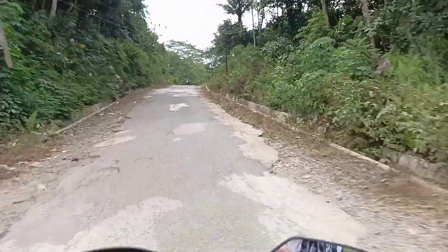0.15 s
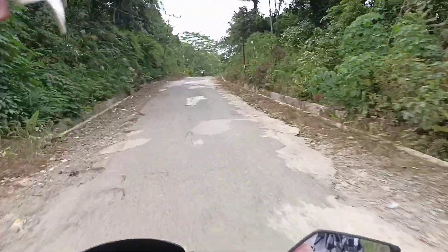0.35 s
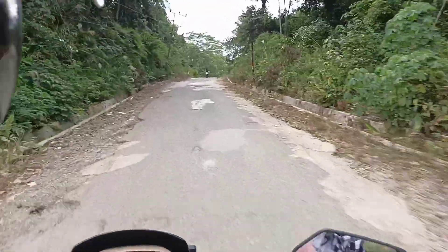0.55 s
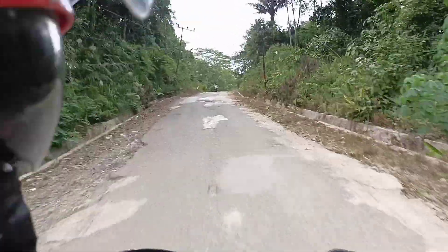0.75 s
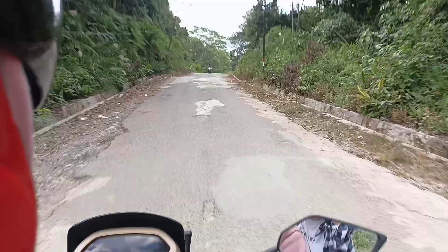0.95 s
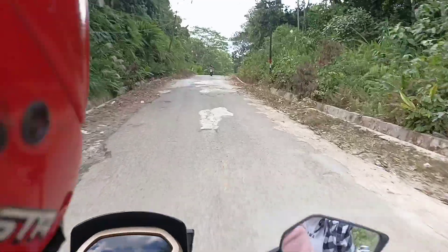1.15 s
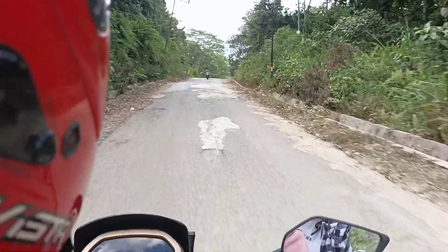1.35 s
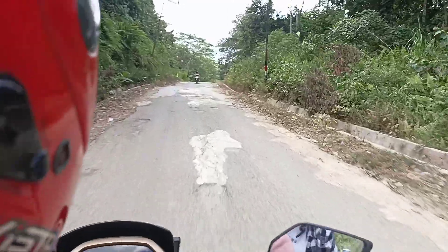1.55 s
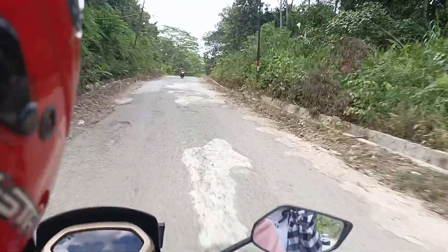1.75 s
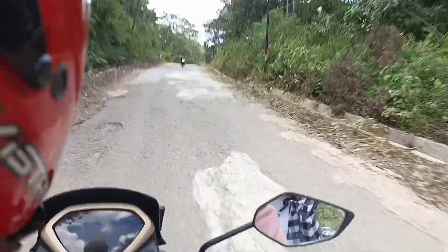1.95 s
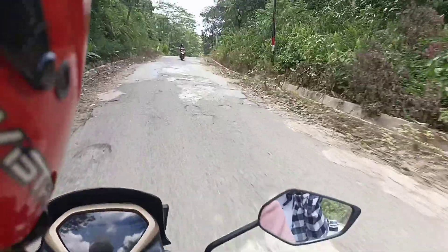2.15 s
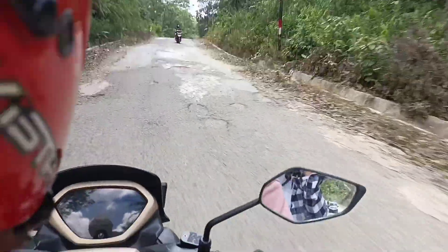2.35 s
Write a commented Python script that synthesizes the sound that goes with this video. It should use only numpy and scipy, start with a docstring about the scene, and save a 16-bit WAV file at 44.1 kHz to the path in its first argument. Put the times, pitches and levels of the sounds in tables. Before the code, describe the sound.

Heavy wind rumble and tearing gusts on a motorbike ride, with tyre hiss and faint metallic chirping

```python
"""Motorbike on a rough country road

Heard from behind the rider, with the slipstream buffeting two microphone ports separately.
Shaped noise makes the wind: lumpy pressure on both ports, rasping gusts and thumps on the left,
short slaps on the right. Underneath lie tyre and air hiss from steadier noise, thin flickering top treble
on the left, an engine hum of wavering harmonics with ringing clatter, and a thin metallic chirp
of narrow-band noise once per engine cycle.
"""
import sys
import numpy as np
from scipy import signal
from scipy.fft import rfft, irfft
from scipy.io import wavfile
from scipy.ndimage import uniform_filter1d

SR = 44100
rng = np.random.default_rng(int(sys.argv[2]) if len(sys.argv) > 2 else 0)


def output_pcm(signal):
    """Save a mono or channel-first signal as 16-bit PCM at the path in sys.argv[1].

    Samples are clipped to [-1, 1] before scaling.
    """
    pcm = np.clip(np.atleast_2d(signal).T, -1, 1) * 32767
    wavfile.write(sys.argv[1], SR, np.round(pcm).astype(np.int16))


N = 110250
TIME = np.arange(N) / SR
FREQS = np.fft.rfftfreq(N, 1 / SR)

# Spectra give relative level per Hz; event lengths are the standard deviation of a bell shape.

# tyre and air hiss, before the trim HISS_DB: start_s, left_db, right_db
HISS_LEVEL = [(0, -48.5, -44.5), (.2, -41.5, -37.5), (.42, -38.5, -35), (.51, -34.5, -31),
              (.61, -37, -37.5), (.69, -36.5, -35), (.8, -38.5, -37), (1.0, -37.5, -37),
              (1.19, -33.5, -34.5), (1.35, -37.5, -36.5), (1.68, -37.5, -38), (1.97, -36.5, -36.5),
              (2.09, -41.5, -41.5), (2.33, -38, -39.5), (2.41, -43, -44), (2.5, -39, -44)]
# hiss spectrum at each port: freq_hz, left_db, right_db
HISS_COLOUR = [(150, -8, -8), (500, 3, 4), (1300, 2, 1), (1750, -3, -4), (2300, -2, -1), (2850, -2, -2.5),
               (3300, -3, -8), (3800, -2, -7), (4350, -6, -11), (4750, -6, -23), (5500, -9, -17),
               (6400, -13, -15), (7400, -12, -11), (8000, -19, -19), (8600, -27, -29), (10000, -38, -50)]
# top treble at the left port: start_s, level_db
TOP_TREBLE_LEVEL = [(0, -55.5), (.48, -57.5), (.53, -48.5), (.59, -55), (.64, -52), (.8, -63), (.93, -57),
                    (.98, -49.5), (1.17, -53.5), (1.22, -51), (2.0, -49.5), (2.33, -54.5), (2.5, -59)]
# top treble spectrum: freq_hz, level_db
TOP_TREBLE_COLOUR = [(4000, -24), (8500, -12), (10000, 2), (12500, -2), (15000, 2)]
HISS_DB, HISS_FLUTTER_DB = 0.5, 2.05  # level trim; rms depth of the flutter

# engine speed: start_s, cycles_per_s
ENGINE_RATE = [(0, 40.1), (.35, 40.4), (1.07, 41.5), (1.35, 42.3), (1.75, 42.5), (2.05, 41.6), (2.5, 40.6)]
# hum harmonics, before their wavering: multiple_of_cycle_rate, left_db, right_db
ENGINE_ORDERS = [(2, -32, -37), (3, -43, -37), (9, -38, -37.5), (10, -43, -37.5)]
# ringing clatter in every cycle, before its swells: freq_hz, width_hz, cycles_after_chirp, left_db, right_db
CLATTER = [(944, 41, -0.65, -46, -45.5), (1476, 140, -0.064, -49, -42.5), (2864, 170, -0.14, -45, -43),
           (5650, 880, 0.011, -53.5, -56)]
CLATTER_S = 0.0026

# base strength of the regular chirps: start_s, level_db
CHIRP_LEVEL = [(0, -53), (.25, -42), (.5, -37.5), (.62, -41), (.9, -38), (1.1, -39.5), (1.6, -38.5),
               (1.8, -36.5), (2.0, -36.5), (2.12, -42), (2.33, -40.5), (2.5, -45)]
# chirps that stand out: start_s (their peak), level_db, pitch_hz, width_hz
LOUD_CHIRPS = [(.686, -29, 4100, 260), (0.711, -30.5, 4170, 150), (.856, -33, 3900, 220),
               (1.195, -31.5, 3830, 240), (1.274, -33.5, 3880, 180)]
# the chirps swell and fade every few cycles: start_s, cycles_per_swell
ACCENT_PERIOD = [(0, 3), (.7, 3), (.85, 2.4), (1.0, 3.39), (1.45, 3.39), (1.6, 3.15), (2.0, 3.3),
                 (2.1, 3.75)]
CHIRP_HZ, CHIRP_WIDTH_HZ, CHIRP_S, CHIRP_SPREAD_DB = 4175, 87, 0.0034, 2.24  # spread: chance per cycle
RING_SHARED, CHIRP_RIGHT_DB = .75, -4  # likeness of ringing at the ports; right port relative to left
FIRST_CHIRP_TURN, FIRST_ACCENT_TURN = .76, .25  # turns until the first chirp, until the first swell peak
ACCENT_DB, ACCENT_TOP = 5.5, .5  # depth; height where the swell flattens, so strong chirps pair up

# single eddies slapping the right port: start_s (their peak), level_db, length_s
SLAPS = [(0.757, -23, 0.0032), (0.882, -22, 0.0059), (0.917, -14, 0.0033), (1.152, -10, 0.0042),
         (1.6, -17, .003), (1.645, -24, 0.0039), (1.775, -24, 0.0016), (1.992, -17, 0.0088),
         (2.03, -19, 0.0065), (2.066, -18, 0.0065)]
# slap spectrum: freq_hz, level_db
SLAP_COLOUR = [(40, -22), (120, 10), (500, 9.5), (900, -15), (1600, -16), (3000, -19), (6000, -51)]
# heavy eddies thumping the left port: start_s (their peak), level_db, length_s
THUMPS = [(.147, -15, 0.0036), (.215, -15, 0.0087), (.408, -15, 0.011), (.491, -19, 0.0033),
          (.53, -14, .007), (.570, -15.5, 0.0059), (.612, -19, 0.0049), (1.1, -15.5, 0.0083),
          (1.21, -16.5, 0.012), (1.49, -18.5, .008), (1.59, -21, 0.0035), (1.735, -23, 0.0062),
          (1.78, -20, 0.0032)]

# wind at the left port, before the torn flow reshapes it: start_s, buffet_db, rasp_db
LEFT_WIND = [(0, -14, -32), (.05, -17.5, -23), (.14, -16.5, -22), (.25, -13.5, -28.5), (.31, -14, -25.5),
             (.41, -17.5, -25.5), (.45, -16, -35), (.53, -17.5, -24.5), (.6, -17, -44.5), (.66, -19, -27),
             (.75, -22, -37), (.81, -18, -21), (.9, -22, -31), (.93, -24, -37), (1.01, -13, -22.5),
             (1.17, -24, -28.5), (1.28, -15.5, -24), (1.38, -15.5, -23.5), (1.57, -18, -23),
             (1.66, -20.5, -32), (1.81, -15.5, -30), (1.87, -15, -21.5), (1.97, -15.5, -23),
             (2.12, -12, -19), (2.18, -16.5, -19), (2.26, -14.5, -19), (2.5, -16, -18)]
# wind at the right port: start_s, buffet_db
RIGHT_WIND = [(0, -35), (.21, -21), (.45, -22.5), (.49, -16.5), (.61, -20.5), (.73, -13), (.81, -17.5),
              (.97, -14.5), (1.09, -25), (1.16, -17), (1.22, -21), (1.27, -16.5), (2.01, -16),
              (2.17, -22.5), (2.33, -16.5), (2.5, -30.5)]
# left buffeting and thump spectrum: freq_hz, level_db
LEFT_BUFFET = [(20, -36), (32, -54), (55, -6.5), (85, -1.5), (130, 2), (250, -2), (400, -6), (550, -12),
               (900, -22), (2000, -80)]
# right buffeting spectrum: freq_hz, level_db
RIGHT_BUFFET = [(20, -25), (30, -38), (55, -15.5), (85, 5), (125, 5), (230, -2), (420, -11.5), (700, -17.5),
                (1200, -28.5), (2000, -38), (4500, -63)]
# rasp spectrum: freq_hz, level_db
RASP_COLOUR = [(100, 4.5), (300, 1), (600, 2.5), (900, 1), (1350, -1), (1900, -7.5), (2600, -14),
               (3500, -21.5), (5000, -38), (8000, -75)]
# short rasping gusts on the left: start_s (their peak), level_db, length_s
GUSTS = [(0.002, -38, .008), (0.015, -20, 0.0093), (0.074, -25.5, 0.0082), (0.09, -21, 0.0072),
         (0.127, -24, 0.0068), (0.142, -26, 0.006), (0.386, -22, 0.0026), (0.611, -16.5, 0.017),
         (0.996, -26, 0.017), (1.048, -23, 0.0083), (1.894, -26, 0.0035), (2.123, -19, 0.0046),
         (2.255, -26, 0.027)]
EDDY_HZ, LEFT_EDDY_DB, RIGHT_EDDY_DB = 44.3, 2.5, 1.5  # lumps in the buffeting
BUFFET_STEADY_S = .07  # window that evens out slower chance swells
FLUTTER_HZ, FLUTTER_DB, RASP_LINK_DB = 143, 1, 3.5  # rasp tears in quick bursts, partly with the pressure
TORN_DB = -27  # rasp level above which the flow counts as torn
# for every dB above TORN_DB:
ROAR_SMOOTHING = .015  # share of the flutter lost: strong gusts fuse into a roar
RUMBLE_HZ, RUMBLE_LOSS = 144, 0.82  # dB lost by the rumble below this pitch
CRACKLE_HZ, CRACKLE_GAIN = 2650, 0.083  # dB gained by the rasp above this pitch

LOW_CUT_HZ, HIGH_CUT_HZ = 36, 15600


def amp(db):
    """Decibels to gain."""
    return 10 ** (np.asarray(db) / 20)


def unit(x):
    """Scales to rms 1."""
    return x / np.sqrt(np.mean(x ** 2) + 1e-20)


def curve(table, order=1):
    """One column of a time table, drawn as straight lines through every sample."""
    rows = np.array(table)
    return np.interp(TIME, rows[:, 0], rows[:, order])


def colour(table, order=1):
    """One column of a spectrum as gains, falling 12 dB more per octave above its last point."""
    rows = np.array(table)
    db = np.interp(np.log(FREQS + 1), np.log(rows[:, 0]), rows[:, order])
    return amp(db) / np.maximum(FREQS / rows[-1, 0], 1) ** 2


def filtered(x, gains):
    """Shapes a sound by a gain at every frequency."""
    return irfft(rfft(x) * gains, N)


def noise(gains, swell_db=0):
    """Noise of rms 1, swelling first and then coloured."""
    return unit(filtered(rng.standard_normal(N) * amp(swell_db), gains))


def below(hz):
    """Gains of a steep low-pass."""
    return 1 / (1 + (FREQS / hz) ** 4)


def wander(hz):
    """Random motion of rms 1, mostly slower than a given rate."""
    return noise(below(hz))


def bump(at, length):
    """A smooth short swell that peaks at a given time."""
    return np.exp(-.5 * ((TIME - at) / length) ** 2)


def bumps(events):
    """Adds up the swells of an event table."""
    return sum(amp(level_db) * bump(at, length) for at, level_db, length in events)


def steadied(x, seconds):
    """Evens out chance swells slower than the window, so the level curves set the loudness."""
    window = max(int(seconds * SR), 1)
    power = abs(uniform_filter1d(x ** 2, window))
    return x / np.sqrt(power + 1e-9)


def each_cycle(turns, seconds):
    """A short swell at every whole engine turn."""
    offset_s = (turns - np.round(turns)) / curve(ENGINE_RATE)
    return np.exp(-.5 * (offset_s / seconds) ** 2)


def ring(hz, width_hz, right_db):
    """Metal singing in a narrow band of noise, partly alike at both ports."""
    band = 1 / np.sqrt(1 + ((FREQS - hz) / width_hz) ** 6)
    left = noise(band)
    right = RING_SHARED * left + np.sqrt(1 - RING_SHARED ** 2) * noise(band)
    return np.array([steadied(left, seconds=.003), amp(right_db) * steadied(right, seconds=.003)])


def hiss():
    """Tyres and rushing air as fluttering noise per port, with thin flickering top treble on the left."""
    gains = [colour(HISS_COLOUR, order) for order in (1, 2)]
    ports = []
    for order, port_gains in enumerate(gains, start=1):
        # rms 1 on the right; the left keeps its balance against it
        balance = np.linalg.norm(port_gains) / np.linalg.norm(gains[1])
        flutter = amp(HISS_FLUTTER_DB * wander(FLUTTER_HZ))
        level = amp(curve(HISS_LEVEL, order) + HISS_DB)
        ports.append(noise(port_gains) * balance * flutter * level)
    treble_flutter = amp(2.0 * wander(FLUTTER_HZ) + 0.71 * wander(9))
    top_treble = unit(noise(colour(TOP_TREBLE_COLOUR)) * treble_flutter) * amp(curve(TOP_TREBLE_LEVEL))
    return np.array([ports[0] + top_treble, ports[1]])


def engine(turns):
    """Wavering harmonics locked to the cycle, and ticking metal; both swell with the road noise."""
    drift = rng.random((2, 1)) + 0.25 * wander(30)  # phase in turns, its start differing per port
    out = np.zeros((2, N))
    for multiple, left_db, right_db in ENGINE_ORDERS:
        tone = np.sqrt(2) * np.cos(2 * np.pi * (multiple * turns + drift))
        out += amp([[left_db], [right_db]]) * tone * amp(2 * wander(36))
    for hz, width_hz, lag, left_db, right_db in CLATTER:
        ticks = each_cycle(turns - lag, CLATTER_S)
        out += amp(left_db) * ticks * ring(hz, width_hz, right_db - left_db)
    return out * unit(amp(curve(HISS_LEVEL)))


def chirps(turns):
    """A part of the drive chirps once per cycle in a limping rhythm, now and then louder and lower."""
    cycle = np.round(turns).astype(int) + 1  # counted from zero
    accent_turns = np.cumsum(curve(ENGINE_RATE) / curve(ACCENT_PERIOD)) / SR - FIRST_ACCENT_TURN
    accent = np.minimum(np.cos(2 * np.pi * accent_turns), ACCENT_TOP)
    chance = rng.standard_normal(cycle.max() + 1)[cycle]
    level_db = curve(CHIRP_LEVEL) + ACCENT_DB * accent + CHIRP_SPREAD_DB * chance
    out = amp(level_db) * each_cycle(turns, CHIRP_S) * ring(CHIRP_HZ, CHIRP_WIDTH_HZ, CHIRP_RIGHT_DB)
    for at, loud_db, hz, width_hz in LOUD_CHIRPS:
        out += amp(loud_db) * bump(at, CHIRP_S) * ring(hz, width_hz, CHIRP_RIGHT_DB)
    return out


def slaps():
    """Single eddies burst on the ports as short noise: dull thumps left, brighter slaps right."""
    left = bumps(THUMPS) * steadied(noise(colour(LEFT_BUFFET)), seconds=0.011)
    right = bumps(SLAPS) * steadied(noise(colour(SLAP_COLOUR)), seconds=0.011)
    return np.array([left, right])


def buffeting(spectrum, eddy_db):
    """Wind pressure on one port: low noise made lumpy by eddies."""
    return steadied(noise(colour(spectrum), eddy_db * wander(EDDY_HZ)), BUFFET_STEADY_S)


def torn_rasp(pressure, torn_db):
    """Tearing flow: noise fluttering partly with the pressure, smoother and brighter when strong."""
    flutter_db = FLUTTER_DB * wander(FLUTTER_HZ) + RASP_LINK_DB * pressure
    flutter_db = flutter_db * np.maximum(1 - ROAR_SMOOTHING * torn_db, 0)
    rasp = steadied(noise(colour(RASP_COLOUR), flutter_db), seconds=0.031)
    crackle = filtered(rasp, 1 / (1 + (CRACKLE_HZ / (FREQS + 1)) ** 4))
    return rasp + crackle * (amp(CRACKLE_GAIN * torn_db) - 1)


def wind():
    """Lumpy pressure at each port; on the left the flow also tears, rasping as its rumble thins."""
    rasp_level = amp(curve(LEFT_WIND, order=2)) + bumps(GUSTS)
    torn_db = np.maximum(20 * np.log10(rasp_level) - TORN_DB, 0)
    left = buffeting(LEFT_BUFFET, LEFT_EDDY_DB)
    rumble = filtered(left, below(RUMBLE_HZ))
    left = left - rumble * (1 - amp(-RUMBLE_LOSS * torn_db))
    right = buffeting(RIGHT_BUFFET, RIGHT_EDDY_DB)
    rasp = torn_rasp(left, torn_db) * rasp_level
    return np.array([left * amp(curve(LEFT_WIND)) + rasp, right * amp(curve(RIGHT_WIND))])


def scene():
    """The sounds of the bike under the wind, with hum, clatter and chirps sharing one engine cycle."""
    turns = np.cumsum(curve(ENGINE_RATE)) / SR - FIRST_CHIRP_TURN
    return hiss() + engine(turns) + chirps(turns) + slaps() + wind()


def record(dry):
    """The recorder cuts the deepest rumble, rounds off the highest peaks and limits the band."""
    ceiling = .68  # full scale is 1
    low_cut = signal.butter(3, LOW_CUT_HZ, "high", fs=SR, output="sos")
    dry = signal.sosfilt(low_cut, dry)
    rounded = dry / (1 + (dry / ceiling) ** 8) ** (1 / 8)
    high_cut = signal.firwin(511, HIGH_CUT_HZ, window=("kaiser", 9), fs=SR)
    return signal.oaconvolve(rounded, high_cut[None], "same")


dry = scene()
out = record(dry)
output_pcm(out)
```